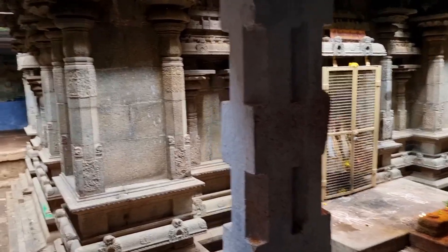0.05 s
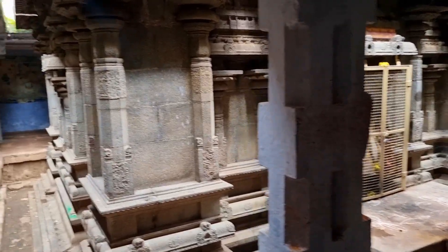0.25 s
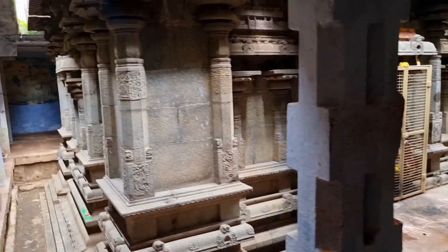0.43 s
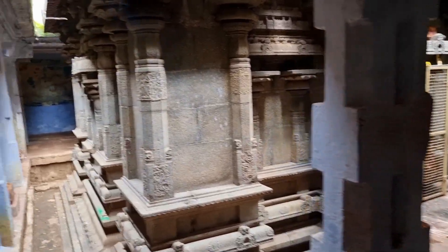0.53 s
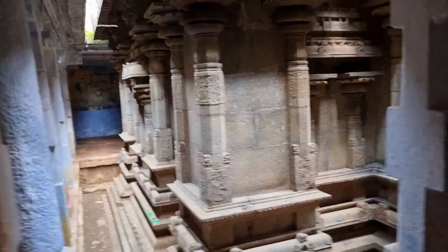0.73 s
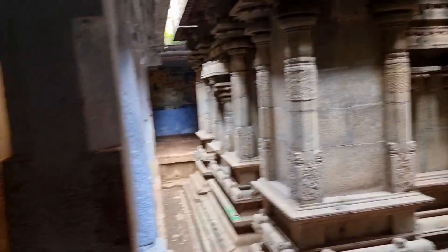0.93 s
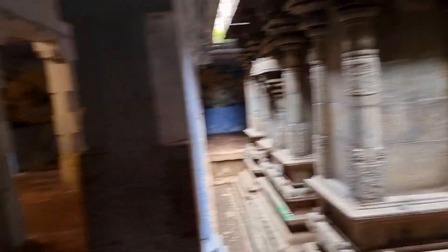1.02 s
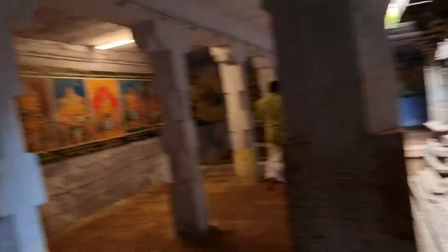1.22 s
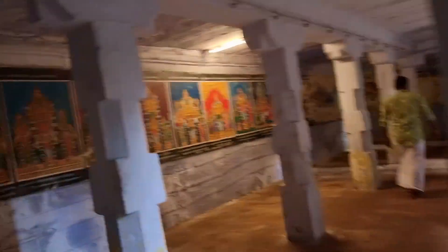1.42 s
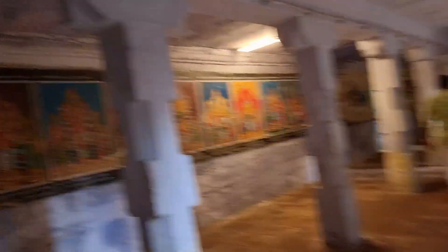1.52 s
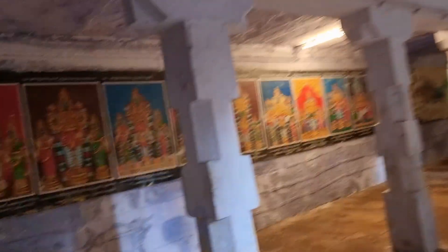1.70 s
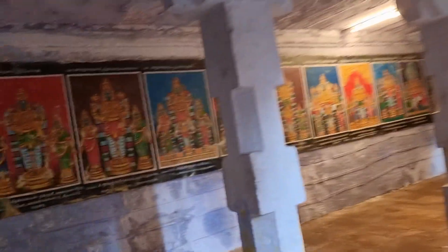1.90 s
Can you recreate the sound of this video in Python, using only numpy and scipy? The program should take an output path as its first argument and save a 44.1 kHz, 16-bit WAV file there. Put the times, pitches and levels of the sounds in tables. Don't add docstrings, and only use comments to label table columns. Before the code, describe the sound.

A quiet stone temple hall with low murk, airy hiss and faint mains hum. At about 0.2 s an unseen bronze bell is struck once: a short clank, bright high partials fading first, then a strong clear tone and lower hum wavering to the end at 2 s. Echoes shift between left and right as the phone turns. A dull distant drag rumbles from 0.5 s; faint foot scuffs and thuds come after 1 s.

```python
import sys
import numpy as np
from scipy import signal
from scipy.fft import rfft, irfft, next_fast_len
from scipy.io import wavfile
from scipy.ndimage import uniform_filter1d, map_coordinates

SR = 44100
rng = np.random.default_rng(int(sys.argv[2]) if len(sys.argv) > 2 else 0)


def undo_db(level):
    steps = np.asarray(level, float) / 20
    return 10 ** steps


def inscribe(sig):
    pcm = np.round(np.clip(np.atleast_2d(sig).T, -1, 1) * 32767)
    wavfile.write(sys.argv[1], SR, pcm.astype(np.int16))


N = 85995
STRIKE_S = .184
LEFT_DB = -1.5
SIDES = np.array([[1], [-1]])


def coloured(points):
    hz, db = np.array(points, float).T
    f = np.maximum(np.arange(N // 2 + 1) * SR / N, 1)
    gain = undo_db(np.interp(np.log(f), np.log(hz), db, left=-90))
    x = irfft(rfft(rng.standard_normal(N)) * gain, N)
    return x / x.std()


def walk(rate):
    hold = int(SR / rate)
    steps = np.repeat(rng.standard_normal(N // hold + 1), hold)
    x = uniform_filter1d(uniform_filter1d(steps, hold), hold)[:N]
    return (x - x.mean()) / x.std()


def spread(points, like_hz):
    high_pass = signal.butter(2, like_hz, "high", fs=SR, output="sos")
    side = signal.sosfilt(high_pass, coloured(points))
    return (coloured(points) + side * SIDES) * undo_db(LEFT_DB / 2 * SIDES)


def mains_hum(t):
    # frequency in Hz, level in dB, wobble in dB.
    hum_lines = [(50, -72.5, 6.5), (152, -54.5, 2), (301.4, -66.5, 5.5), (424, -71, 5.5)]
    dip_s, dip_width_s, dip_db = 1.2, 0.32, -6.5
    hum = 0
    for hz, db, wobble_db in hum_lines:
        level = undo_db(db + wobble_db * walk(5.59)) * np.sqrt(2)
        hum = hum + level * np.sin(2 * np.pi * hz * t + .6 * walk(4.56))
    dip = dip_db * np.exp(-((t - dip_s) / dip_width_s) ** 2)
    return hum * undo_db(dip + LEFT_DB / 2 * SIDES)


def background(t):
    # frequency in Hz, level in dB per Hz.
    air_colour = [(1350, 4), (2300, -6), (3510, -10), (6390, -13.5), (9000, -20), (15500, -36)]
    # frequency in Hz, level in dB per Hz.
    murk_colour = [(25, -41.5), (45, 1), (70, -6.5), (160, -6.5), (300, -1), (450, -5.5), (750, -10.5),
                   (2400, -46.5)]
    murk = spread(murk_colour, 350) * undo_db(-.6 * SIDES) * undo_db(-50 + 0.95 * walk(2.8))
    air = spread(air_colour, 350) * undo_db(-63.5 + 1.1 * walk(6.5))
    return murk + air + mains_hum(t)


def ring(t, hz, db, t60):
    return undo_db(db - 60 * t / t60) * np.sin(2 * np.pi * hz * t)


def pair(t, hz, split, db, partner_db, t60):
    return ring(t, hz, db, t60) + ring(t, hz + split, db + partner_db, t60)


def clank(t):
    level_db, decay_s, centre_hz = -9.5, 0.0041, 1680
    band = signal.butter(3, [centre_hz / 3.3, centre_hz * 2.26], "band", fs=SR, output="sos")
    burst = rng.standard_normal(N) * (t > 0) * np.exp(-np.abs(t) / decay_s)
    return undo_db(level_db) * signal.sosfilt(band, burst)


def bell(t):
    # frequency in Hz, split of the pair in Hz, level in dB, partner in dB, t60 in s.
    hum_tone = (812.1672, -5.4729, -13.4, -10.9, 9)
    main_tone = (1927.9198, 4.3547, -2.8, -11.1, 2.7406)
    body_modes = [(1780, 6, -11, -4, 1.2), (3043, 8, -15, -3, 1.2), (3446, -7, -16, -4, 1.3),
                  (1314, 4, -40, -3, .8), (2126, 43, -34, -1, .5), (2584, 5, -46, -3, .6),
                  (3774, 9, -42, -3, .7), (4005, 9, -42, -3, .5), (4188, 9, -45, -3, .4),
                  (1750, 62, -27, -4, .6)]
    # frequency in Hz, level in dB, t60 in seconds.
    rim_modes = [(4635, -32, .7), (4742, -30, .6), (4764, -31, .5), (4883, -30, .8), (4910, -30, .85),
                 (5292, -31, .75), (5355, -32, .6), (5491, -35, .4), (6002, -42, .4), (6363, -49, .35),
                 (7004, -40, .45), (7424, -36, .5), (7930, -44, .4)]
    # frequency in Hz, level in dB, t60 in seconds.
    shimmer_modes = [(6850, -43, .4), (7180, -44, .4), (8100, -47, .35), (8818, -58, .3), (9157, -47, .4),
                     (9388, -44, .4), (9771, -44, .4), (11250, -57, .3), (11600, -57, .3), (11900, -56, .3),
                     (12280, -53, .35)]
    bell_db, rim_db, shimmer_db, swell_s = -18, 2, 1, .012
    t = t - STRIKE_S
    swell = undo_db(bell_db) * np.clip(t / swell_s + .3, 0, 1)
    high = sum(pair(t, *mode) for mode in body_modes)
    high = high + undo_db(rim_db) * sum(ring(t, *mode) for mode in rim_modes)
    high = high + undo_db(shimmer_db) * sum(ring(t, *mode) for mode in shimmer_modes)
    return swell * pair(t, *hum_tone), swell * pair(t, *main_tone), swell * high, clank(t)


def pillar_echoes(low, main, high, t):
    # delay in seconds, high tones in dB, lowest tone in dB, bearing in rad, approach in m/s.
    strong_paths = [(0.003205, 2.0, 3.4, -0.34, -0.334), (0.006293, -0.5, 1.7, -1.137, -0.1649),
                    (0.013924, -0.4, -4.0, 1.812, -0.196), (0.042292, 2.7, -20.6, -0.722, 0.8515),
                    (0.045349, -30.0, 7.7, -0.042, -0.8928), (0.052938, -4.6, -19.5, -1.627, -1.0117),
                    (0.07697, -30.0, 9.0, -1.143, -0.8172), (0.095042, -2.8, -5.3, 1.416, 0.3343),
                    (0.101543, 1.2, -7.5, 1.079, -0.0755), (0.18192, 6.0, -5.6, 1.073, 0.0659),
                    (0.253425, 4.6, -5.7, -0.244, 0.0471), (0.29073, -12.4, -2.7, 0.516, 0.45)]
    turn_mid_s, turn_s, turn_rad = .6916, .259, .9714
    ports_s = 2.2e-4
    upper_db = -8.5
    heading = turn_rad * np.tanh((t - turn_mid_s) / turn_s)
    upper = main + undo_db(upper_db) * high
    out = 0
    for late, high_db, low_db, bearing, speed in strong_paths:
        lag = ports_s * np.sin(bearing - heading) * SIDES
        place = (t - late + speed / 343 * (t - STRIKE_S) - lag) * SR
        mix = undo_db(high_db) * upper + undo_db(low_db) * low
        out = out + map_coordinates(mix, [place], order=3)
    return out


def hall(x, t):
    t60_s, treble_t60_s, rise_s, views = 1.1, .6, .03, 16
    size = next_fast_len(2 * N)
    low_pass = signal.butter(1, 2500, fs=SR, output="sos")
    rise = 1 - np.exp(-t / rise_s)
    spectrum = rfft(x, size)
    out = np.zeros((2, N))
    for k in range(views):
        fade = np.cos(np.clip(t / t[-1] * (views - 1) - k, -1, 1) * np.pi / 2)
        noise = rng.standard_normal((2, N))
        dull = signal.sosfilt(low_pass, noise)
        treble = noise - dull
        tail = rise * (dull * undo_db(-60 * t / t60_s) + treble * undo_db(-60 * t / treble_t60_s))
        tail = tail / np.sqrt(np.sum(tail[0] ** 2))
        out += fade * irfft(spectrum * rfft(tail, size), size)[:, :N]
    return out


def drag(t):
    # frequency in Hz, level in dB per Hz.
    drag_colour = [(120, -14.5), (250, -4.5), (420, 1), (600, -5.5), (1000, -12), (1600, -17),
                   (5000, -35.5), (15000, -54)]
    start_s, hold_s, rise_s, t60_s = 0.4795, 0.23, 0.042, 1.0
    u = t - start_s
    shape = np.clip(u / rise_s, 0, 1) * undo_db(-60 * np.maximum(u - hold_s, 0) / t60_s)
    return spread(drag_colour, 300) * shape * undo_db(-38 + 0.62 * walk(40))


def scuffs(t):
    # time of the peak in seconds, length in seconds, level in dB, centre in Hz.
    foot_scuffs = [
        (1.081, .06, -69, 9000),
        (1.562, 0.092, -67.5, 5650),
        (1.72, .03, -73.5, 8330),
        (1.873, 0.041, -64, 4700),
        (1.497, 0.052, -52, 181),
        (1.64, 0.11, -52.5, 176),
    ]
    out = 0
    for peak_s, length_s, db, hz in foot_scuffs:
        wide = 1.7 if hz > 1000 else 1.12
        band = [(hz / wide ** 2, -24), (hz / wide, -3), (hz * wide, -3), (hz * wide ** 2, -24), (SR, -90)]
        out = out + spread(band, 400) * undo_db(db) * np.exp(-((t - peak_s) / length_s) ** 2)
    return out


def scene():
    t = np.arange(N) / SR
    low, main, high, knock = bell(t)
    long_hall_db, hall_db = -17, 4
    diffuse = hall(undo_db(long_hall_db) * (low + main) + undo_db(hall_db) * high + knock, t)
    return background(t) + pillar_echoes(low, main, high, t) + diffuse + drag(t) + scuffs(t)


def band_limit(x):
    return signal.sosfilt(signal.butter(12, 16120, fs=SR, output="sos"), x)


def record(dry):
    top_cut = signal.ellip(8, .2, 70, 15900, fs=SR, output="sos")
    mix = signal.sosfilt(top_cut, dry)
    return band_limit(mix)


dry = scene()
out = record(dry)
inscribe(out)
```